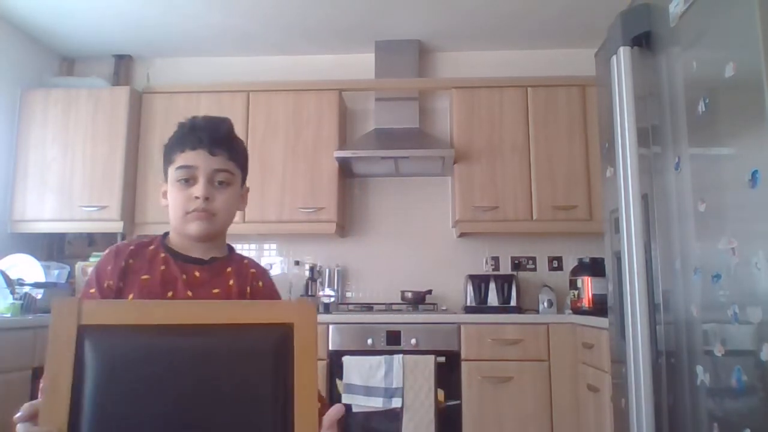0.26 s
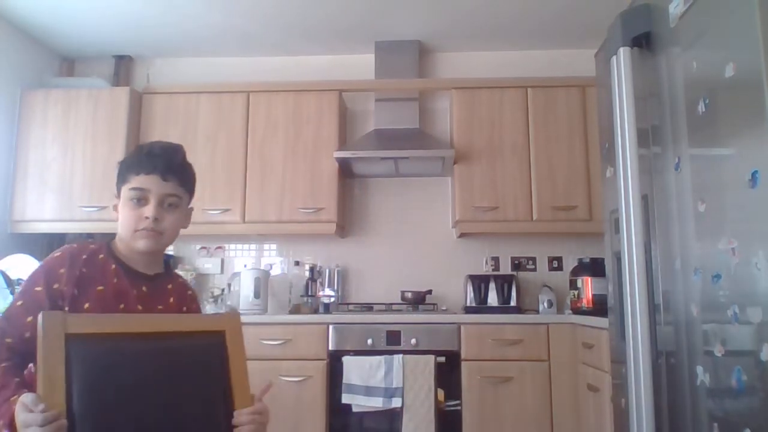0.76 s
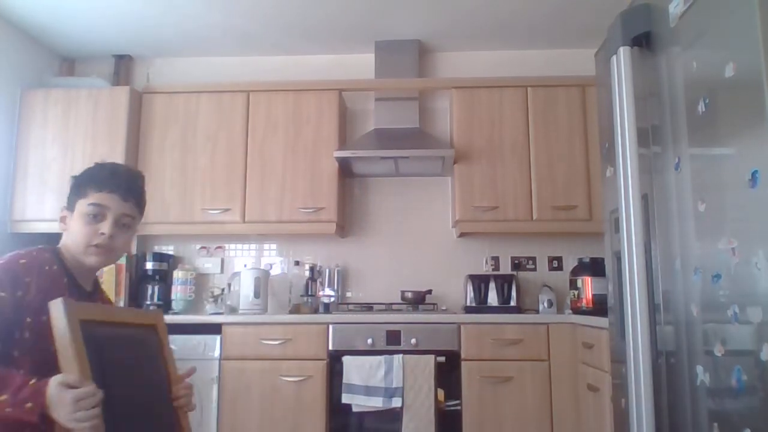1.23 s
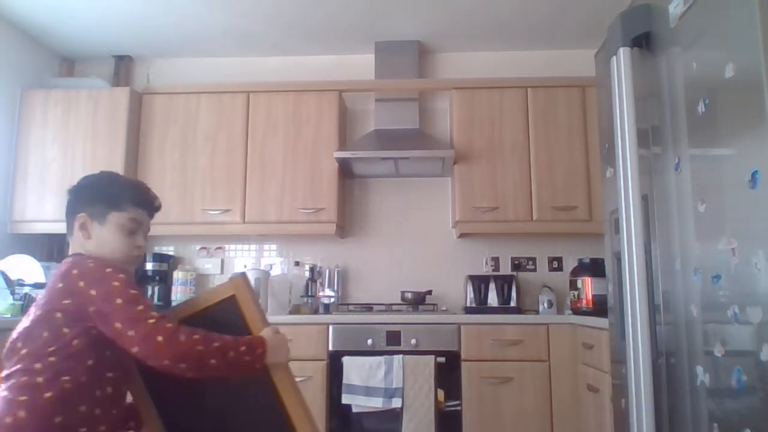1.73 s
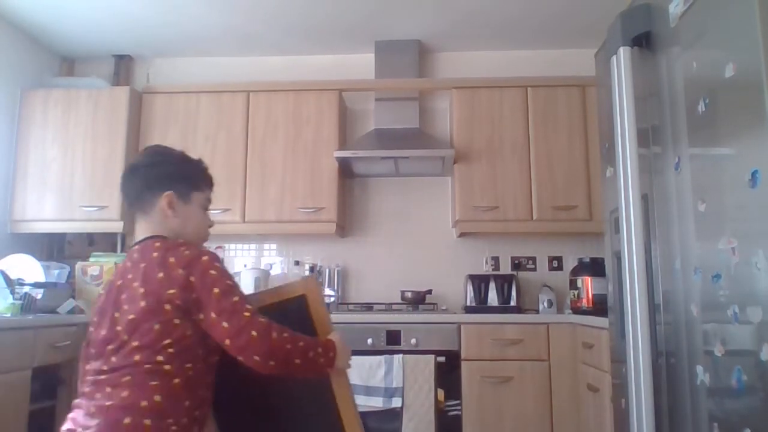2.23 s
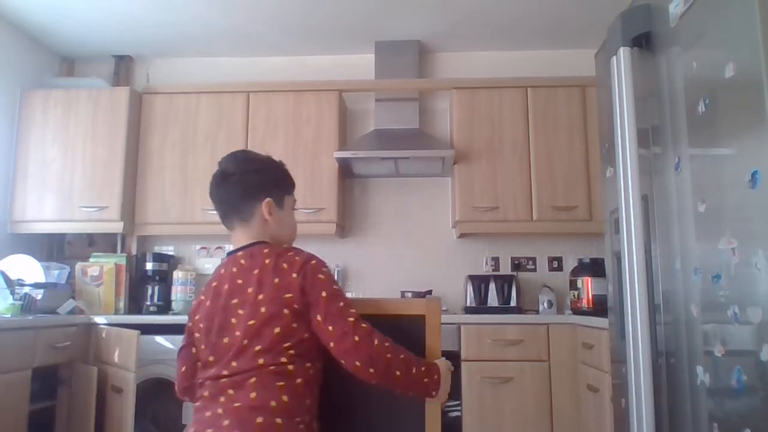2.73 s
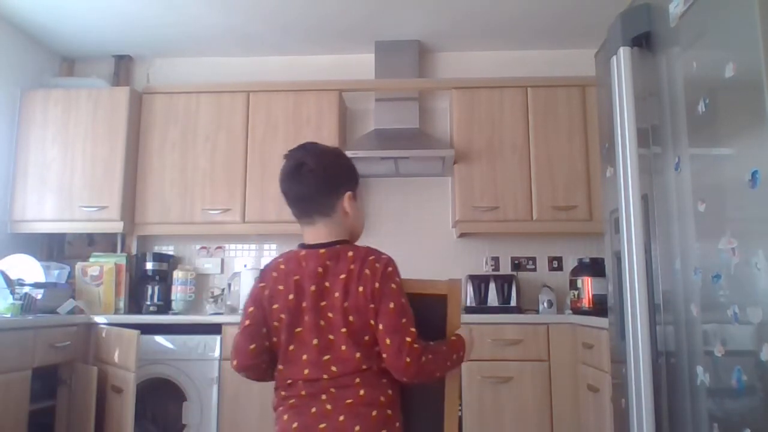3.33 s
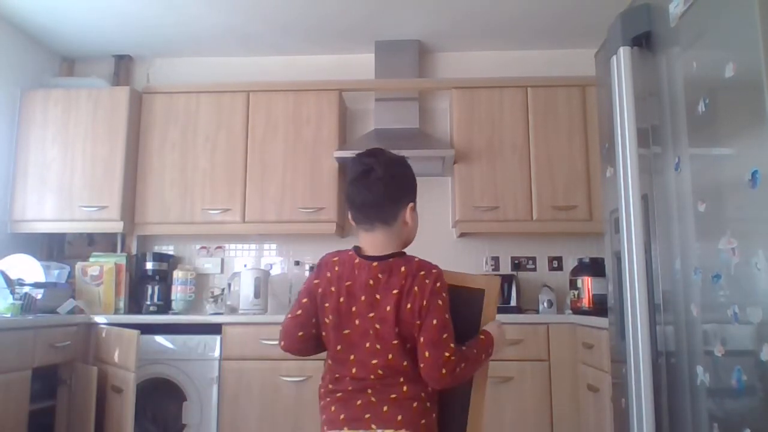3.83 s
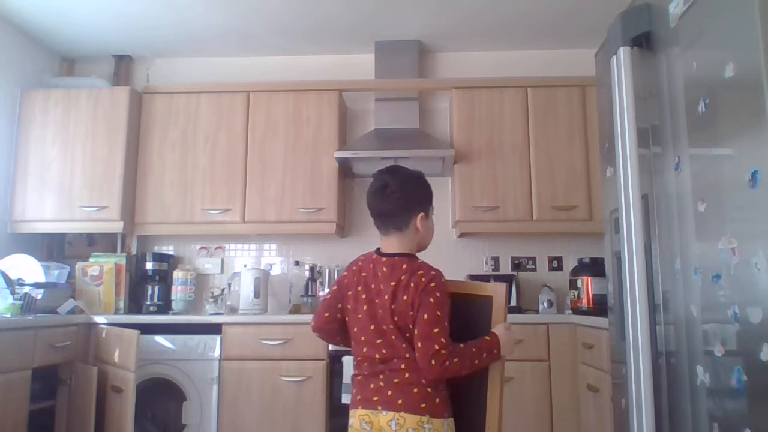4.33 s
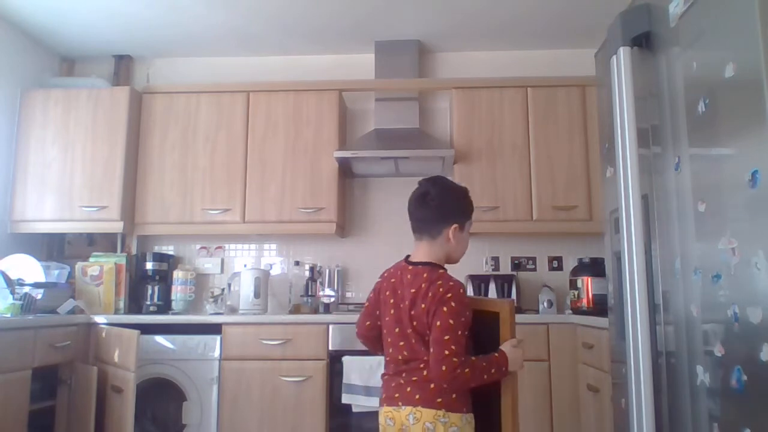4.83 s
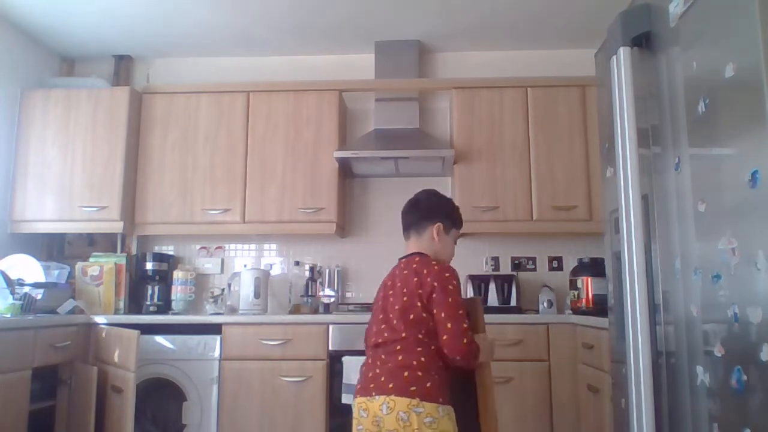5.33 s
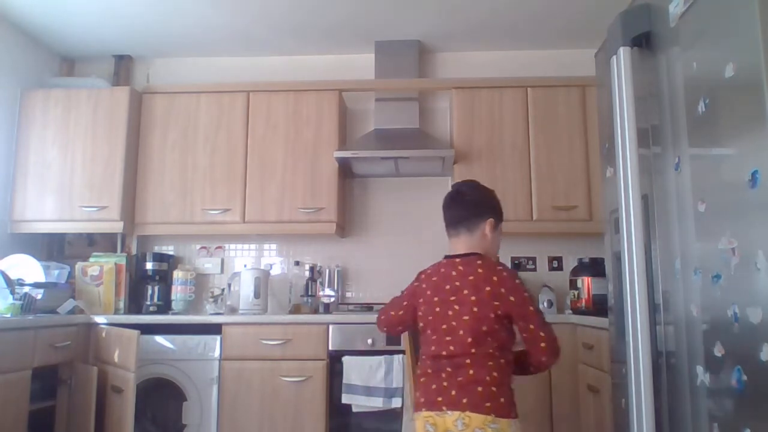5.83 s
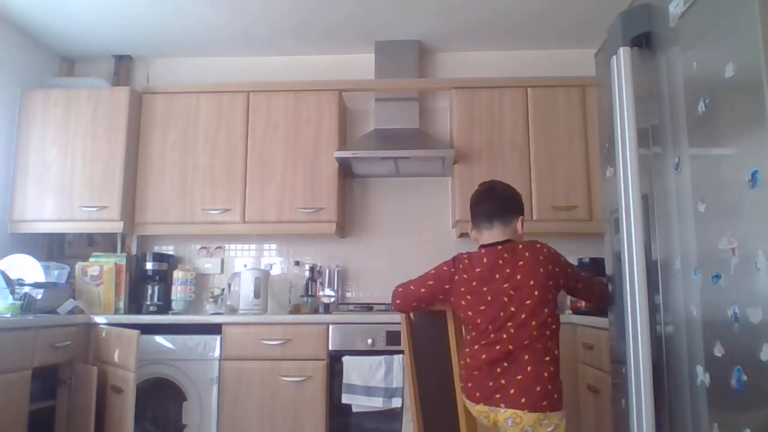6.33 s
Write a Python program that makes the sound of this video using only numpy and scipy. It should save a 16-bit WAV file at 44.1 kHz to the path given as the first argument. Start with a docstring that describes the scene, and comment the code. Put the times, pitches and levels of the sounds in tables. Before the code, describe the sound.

A sharp, close wooden knock opens, followed by faint clothing rustle and soft low footfalls. After a second and a half a chair leg judders and clatters loudly over the floor, with a dull rumble beneath. Quieter hollow bumps come later, spaced apart, fading to small taps. Small reverberant kitchen, cheap laptop microphone with steady hiss and faint buzz.

```python
"""A wooden chair, carried by a child across a small, hard-walled kitchen, scrapes and knocks near a laptop microphone.
Impact: each knock is a graze, a coloured pulse and its rebounds, filtered by the reflections and modes of the room.
Stick-slip: the dragged leg judders as a train of small, unevenly spaced blows.
Between them come footfalls (decaying low tones), rustling clothes and a rumble (shaped noise under envelopes),
over the microphone's hiss with thin whines and a faint harmonic buzz."""
import sys
import numpy as np
from scipy import signal
from scipy.fft import rfft, irfft
from scipy.io import wavfile

SR = 44100
rng = np.random.default_rng(int(sys.argv[2]) if len(sys.argv) > 2 else 0)


def wrap_up_sound(samples):
    """Save the sound to the file named by the first command line argument, as 16-bit audio."""
    columns = np.atleast_2d(samples).T
    # keep every value between -1 and 1, then stretch to whole-number steps
    tamed = np.clip(columns, -1, 1)
    steps = np.round(tamed * 32767).astype(np.int16)
    wavfile.write(sys.argv[1], SR, steps)


N = 289610
TIME = np.arange(N) / SR

# The chair bumps floor or cabinet. Each row: start in seconds, strength in dB, bass weight in dB, treble in dB,
# pitch of the struck part in Hz, its lift in dB, direct sound in dB, change per rebound in dB.
KNOCKS = [ (0.000, 14.5, -2, -11, 1100, 5.5, -4.5, -9.5), (0.015, 10.5, -8, -11.5, 1590, 10.5, -10, -6.5),
          (0.004, -1.5, 7.5, -35, 131, 11, 8, -16), (1.569, 16.5, 1, 6.5, 464, 4, -15.5, -0.5),
          (1.595, 14.5, 4.5, -9, 800, 3, -8, -8), (1.667, 18.5, 0.5, -0.5, 330, 3.5, -7.5, -3.5),
          (1.748, 13, -14, -10.5, 530, 2, -12, -1), (1.790, 8.5, 1.5, -20, 172, 5, -2, -16),
          (2.62, -23, 5, 13, 6300, 5, -9, -14), (2.641, -8.5, 14, -12, 1180, 6.5, -5, -7.5),
          (4.130, 8, 3.5, -7.5, 650, 6.5, -10, -7.5), (4.137, -12, -5, -8, 389, 31.5, 9.5, -30),
          (4.176, 3, 5, -29, 254, 8, -6, -12), (4.250, 4.5, 7, -10.5, 475, 1.5, -11, -6),
          (4.605, 10.5, 3.5, -7, 616, 6, -5.5, -3), (5.131, -8, 10, -40, 251, 22, -1.5, -30),
          (5.139, 7.5, 6, -8.5, 350, -0.5, -12, -2.5), (5.149, 8, -15.5, -14.5, 1200, 8, -2.5, -5.5),
          (5.633, -15, 5.5, -15, 460, -1, -6.5, -9), (5.962, -23, 6, 0, 1180, -4, -11, -8),
          (6.346, -16, 18.5, 14.5, 158, 1.5, -20, -13), (6.372, -7.5, 7, -15, 1200, 10, -5, -8)]
# A leg dragged over the floor. Each row: time in seconds, strength of the slips in dB.
DRAG = [(1.56, -12), (1.585, 2), (1.62, -2), (1.65, 7), (1.68, 9.5), (1.72, 12), (1.76, 4), (1.79, -3),
        (1.83, -20)]
# The chair's colour when struck. Each row: frequency in Hz, level in dB.
WOOD_COLOUR = [(20, -2.5), (45, 0), (80, -17.5), (120, -7.5), (170, -5), (250, -3), (400, -3), (700, -5.5),
               (1250, -5.5), (2000, -9), (3000, -14), (5000, -23), (8000, -31), (15000, -39.5)]
# Ringing of chair and cabinets in the room. Each row: frequency in Hz, relative level in dB, T60 in seconds.
RINGING_MODES = [(42.8, -8.5, 1), (136.5, 4.5, 0.11), (177.5, -7.5, 0.95), (291, -5, 0.613),
                 (358.9, 7.5, 0.34), (442.5, 1.5, 0.3), (504, -0.5, 0.34), (510, -5, 0.55), (556, 0, 0.44),
                 (680.5, 1, 0.44), (780, -17, 1), (857, -14, 0.63), (995, 3, 0.43), (1076, 3.5, 0.15),
                 (1285, -2, 0.332), (1440, 6.5, 0.29), (1513, -14, 0.95), (1916, -2, 0.49)]
# The kitchen's reverberation. Each row: frequency in Hz, T60 in seconds.
KITCHEN_T60 = [(50, 0.83), (150, 0.51), (400, 0.46), (1200, 0.44), (2500, 0.44), (5000, 0.39),
               (14000, 0.32)]
# Footfalls and thuds carried by the floor. Each row: start in seconds, level in dB, frequency in Hz.
STEPS = [(0.169, -38, 20.5), (0.497, -42.5, 16.7), (1.016, -32, 16.5), (2.614, -39, 16.6),
         (2.628, -51.5, 52), (3.953, -48, 9.9), (4.15, -46, 53), (5.168, -38.5, 43), (5.739, -42, 15.6),
         (6.01, -61, 29), (6.382, -50, 46)]
# Strokes of clothes rubbing on the chair. Each row: start in seconds, length in seconds, body in dB, fizz in dB.
RUSTLES = [(0.08, 0.26, -62.5, -64.5), (0.442, 0.4, -65.5, -78), (0.871, 0.37, -61, -71.5),
           (2.338, 0.34, -79, -87.5), (2.746, 0.058, -71.5, -77), (3.616, 0.091, -69, -75),
           (3.837, 0.084, -73, -88), (4.92, 0.28, -70, -75), (5.15, 0.31, -65.5, -68),
           (6.063, 0.072, -75, -78)]
# Spectrum of the rustle's body. Each row: frequency in Hz, relative level in dB.
CLOTH_BODY = [(100, -16), (300, -2), (600, -5), (1300, -3), (2200, -4.5), (3000, -10.5), (4000, -10.5),
              (5500, -16), (12000, -23)]
# Spectrum of the rustle's fizz. Each row: frequency in Hz, relative level in dB.
CLOTH_FIZZ = [(1000, -11), (4000, -17.5), (7000, 2), (9000, 1), (13500, 3), (16000, 5.5)]
# Spectrum of the rumble. Each row: frequency in Hz, relative level in dB.
RUMBLE_COLOUR = [(40, -13), (100, 4), (190, 8), (260, -5), (360, -4), (500, -37), (1500, -49)]
# Spectral density of the steady background. Each row: frequency in Hz, relative level in dB per Hz.
BACKGROUND_COLOUR = [(8, -7), (20, 11.5), (45, -14), (100, -19.5), (200, -23), (400, -26.5), (800, -27.5),
                     (1400, -29.5), (2050, -27.5), (2700, -34.5), (4300, -40.5), (9000, -41.5),
                     (14000, -40), (15600, -52)]
# Narrow whines in the microphone's hiss. Each row: centre in Hz, width in Hz, level in dB.
WHINES = [(3063, 75, -90), (6030, 110, -97), (8000, 6.6, -95), (10070, 410, -85), (13000, 420, -89),
          (15340, 530, -83)]
# Harmonics of the buzz. Each row: multiple of the fundamental, level in dB.
BUZZ_HARMONICS = [(2, -73), (3, -75), (4, -77), (5, -78), (6, -84), (7, -87.5), (10, -104.5), (11, -85),
                  (13, -86.5)]

GRAZE_LEAD_S, GRAZE_DB, GRAZE_DIRECT_DB = 0.0055, -10.5, -17
# The loose frame rebounds at growing intervals, each time duller and lighter.
REBOUND_S, REBOUND_SPREAD = 0.0105, 1.6
REBOUND_TREBLE_DB, REBOUND_WEIGHT_DB = -7.5, -4
STEP_T60_S = 0.85
RUSTLE_RISE_S, RUSTLE_FALL_S = 0.11, 0.1
RUMBLE_START_S, RUMBLE_LENGTH_S, RUMBLE_DB = 1.29, 1.08, -66
RUMBLE_RISE_S, RUMBLE_FALL_S = 0.12, 0.2
BACKGROUND_DB = -58.5
BUZZ_HZ = 29.87
BAND_LIMIT_HZ = 15800


def amp(db):
    """Amplitude ratio: 20 dB is a factor of ten."""
    return 10 ** (np.asarray(db) / 20)


def unit(x):
    """Normalisation to a root mean square of 1."""
    return x / np.sqrt(np.mean(x ** 2) + 1e-20)


def read(points, hz):
    """Linear interpolation of a table on a logarithmic frequency axis."""
    table_hz, value = np.transpose(points)
    return np.interp(np.log(hz + 1), np.log(table_hz), value)


def add(mix, s, sound):
    """Superposition: adds a sound to the mix at time s."""
    part = mix[max(round(s * SR), 0):][:len(sound)]
    part += sound[:len(part)]


def decay(t, t60):
    """Exponential damping: the amplitude falls by 60 dB in t60 seconds."""
    return np.exp(-np.log(1000) * t / t60)


def noise(gain_at):
    """Filtered noise: white noise weighted in frequency by gain_at(Hz), at rms 1."""
    spectrum = rfft(rng.standard_normal(N))
    return unit(irfft(spectrum * gain_at(np.fft.rfftfreq(N, 1 / SR)), N))


def hiss(points):
    """Filtered noise of rms 1 with its spectrum read from a table."""
    return noise(lambda hz: amp(read(points, hz)))


def blow(weight_db, treble_db, part_hz, lift_db, bass_hz=450, treble_hz=2700,
         part_width=0.18, bending=0.348, size=4096):
    """Impact excitation: weight sets the bass, hardness the treble, and the struck part resonates at its pitch."""
    signed_hz = np.fft.fftfreq(size, 1 / SR)
    hz = abs(signed_hz)
    db = read(WOOD_COLOUR, hz)
    db = db + weight_db / (1 + (hz / bass_hz) ** 2)
    db = db + treble_db * hz ** 2 / (hz ** 2 + treble_hz ** 2)
    db = db + lift_db / (1 + ((hz / part_hz - 1) / part_width) ** 2)
    # minimum phase makes the pulse causal
    causal = np.exp(np.conj(signal.hilbert(np.log(amp(db)))))
    # dispersion: bending waves in wood carry the treble faster than the bass
    lag = bending * np.sign(signed_hz) * np.sqrt(hz)
    return np.fft.ifft(causal * np.exp(-1j * lag)).real[:size // 2]


def kitchen(direct_db, ring_db=-55.5, build_s=0.0068, taps_per_s=3500):
    """Room impulse response: direct sound, thickening reflections damped by frequency, and ringing modes."""
    t = np.arange(SR) / SR
    density = taps_per_s / SR * (1 - np.exp(-t / build_s))
    taps = rng.choice([-1, 1], SR) * (rng.random(SR) < density)
    hz, at, bands = signal.stft(taps, SR, nperseg=512)
    damped = bands * decay(at, read(KITCHEN_T60, hz)[:, None])
    tail = signal.istft(damped, SR)[1][:SR]
    path = tail / np.linalg.norm(tail)
    path[0] += amp(direct_db)
    for mode_hz, db, t60 in RINGING_MODES:
        tone = np.sin(2 * np.pi * (mode_hz * t + rng.random()))
        path += amp(ring_db + db) * decay(t, t60) * tone
    return path


def knocks(count=3):
    """Repeated impact: a graze, a blow and its rebounds, each from another spot with its own reflections."""
    out = np.zeros(N)
    for s, db, weight_db, treble_db, part_hz, lift_db, direct_db, rebound_db in KNOCKS:
        graze = blow(weight_db, treble_db, part_hz, lift_db=0)
        graze_in_room = signal.fftconvolve(graze, kitchen(GRAZE_DIRECT_DB))
        add(out, s - GRAZE_LEAD_S, amp(db + GRAZE_DB) * graze_in_room)
        for k in range(count):  # k = 0 is the blow itself
            contact_weight_db = weight_db + k * REBOUND_WEIGHT_DB
            contact_treble_db = treble_db + k * REBOUND_TREBLE_DB
            contact = blow(contact_weight_db, contact_treble_db, part_hz, lift_db)
            contact_in_room = signal.fftconvolve(contact, kitchen(direct_db))
            add(out, s + REBOUND_S * k ** REBOUND_SPREAD, amp(db + k * rebound_db) * contact_in_room)
    return out


def drag(slips_per_s=85, uneven=0.3, scatter_db=2, count=32):
    """Stick-slip friction: the leg slips at an uneven pace, each slip a small blow further along the floor."""
    s, db = np.transpose(DRAG)
    gap, size = rng.standard_normal((count, 2)).T
    times = s[0] + np.cumsum(np.exp(uneven * gap)) / slips_per_s
    levels_db = np.interp(times, s, db) + scatter_db * size
    slips = np.zeros(N)
    for at, slip_db in zip(times[times < s[-1]], levels_db):
        add(slips, at, amp(slip_db) * kitchen(direct_db=-8.0))
    slip_pulse = blow(weight_db=-3.5, treble_db=-11.0, part_hz=443, lift_db=9.5)
    return signal.oaconvolve(slips, slip_pulse)[:N]


def steps(rise_s=0.005):
    """Damped oscillation: footfalls and thuds set the floor swinging at low frequencies."""
    out, t = np.zeros(N), np.arange(SR) / SR
    envelope = (1 - np.exp(-t / rise_s)) ** 2 * decay(t, STEP_T60_S)
    for s, db, hz in STEPS:
        add(out, s, amp(db) * envelope * np.sin(2 * np.pi * hz * t))
    return out


def swell(start, length, rise_s, fall_s):
    """Amplitude envelope: a linear rise, a hold until length has passed, and an exponential fall."""
    t = TIME - start
    return np.clip(t / rise_s, 0, 1) * np.exp(-np.maximum(t - length, 0) / fall_s)


def clothes(grain_db=0.5, grain_hz=90):
    """Sliding friction: fabric strokes make noise, and small catches modulate both its body and its fizz."""
    body, fizz = np.zeros((2, N))
    for s, length, body_db, fizz_db in RUSTLES:
        stroke = swell(s, length, RUSTLE_RISE_S, RUSTLE_FALL_S)
        body += amp(body_db) * stroke
        fizz += amp(fizz_db) * stroke
    catches = amp(grain_db * noise(lambda hz: 1 / (1 + (hz / grain_hz) ** 2)))
    return catches * (body * hiss(CLOTH_BODY) + fizz * hiss(CLOTH_FIZZ))


def rumble():
    """Low-frequency noise under an envelope: a dull rumble swells and fades as the chair is swung round."""
    envelope = swell(RUMBLE_START_S, RUMBLE_LENGTH_S, RUMBLE_RISE_S, RUMBLE_FALL_S)
    return amp(RUMBLE_DB) * envelope * hiss(RUMBLE_COLOUR)


def whines():
    """Narrow-band noise: each thin whine is noise within a Gaussian band."""
    out = np.zeros(N)
    for centre, width, db in WHINES:
        out += amp(db) * noise(lambda hz: np.exp(-2 * ((hz - centre) / width) ** 2))
    return out


def buzz():
    """Harmonic series: cosines aligned in phase add up to a softly ticking electrical buzz."""
    out = np.zeros(N)
    for multiple, db in BUZZ_HARMONICS:
        # the root of 2 makes the level an rms value
        out += amp(db) * np.sqrt(2) * np.cos(2 * np.pi * multiple * BUZZ_HZ * TIME)
    return out


def background():
    """Stationary noise: room tone and microphone hiss, with the whines and the buzz."""
    return amp(BACKGROUND_DB) * hiss(BACKGROUND_COLOUR) + whines() + buzz()


def scene():
    """Superposition of all sources at the one microphone."""
    return (knocks() + drag() + steps() + clothes() + rumble() + background())[None]


def record(dry):
    """Band limitation: the recorder passes only what lies below its upper limit."""
    lowpass = signal.firwin(801, BAND_LIMIT_HZ, window=("kaiser", 9), fs=SR)
    return signal.oaconvolve(dry, lowpass[None], "same")


dry = scene()
out = record(dry)
wrap_up_sound(out)
```